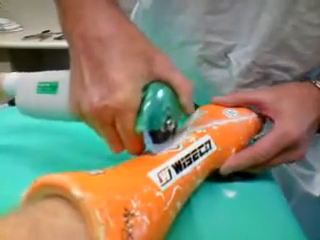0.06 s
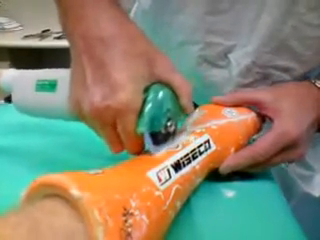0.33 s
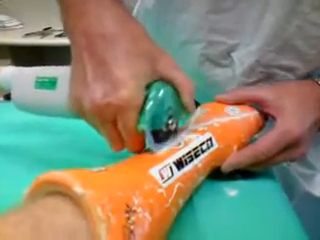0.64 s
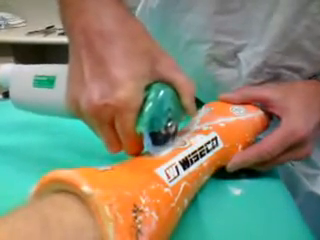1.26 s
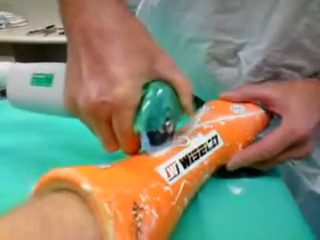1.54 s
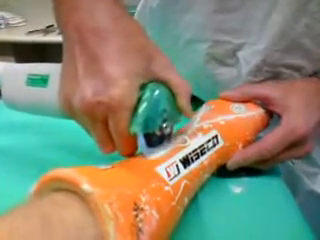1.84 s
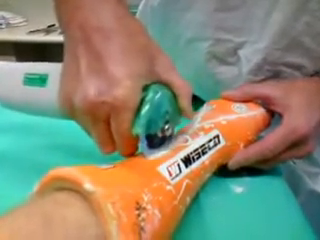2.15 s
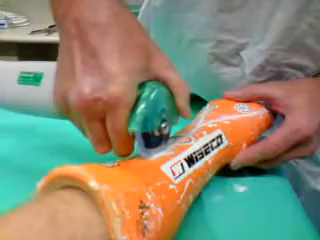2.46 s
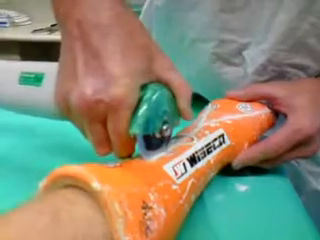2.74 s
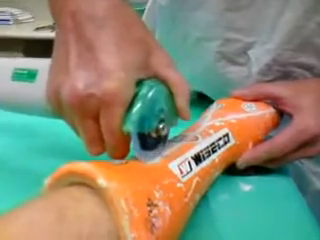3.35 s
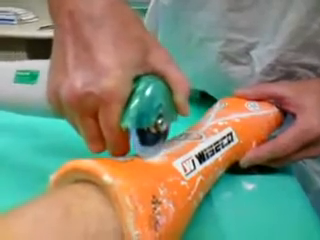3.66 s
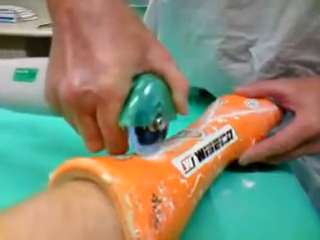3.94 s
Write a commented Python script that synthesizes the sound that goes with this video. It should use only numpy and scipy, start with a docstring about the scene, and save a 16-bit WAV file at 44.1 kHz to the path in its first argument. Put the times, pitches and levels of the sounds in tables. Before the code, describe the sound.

An electric saw buzzes loudly and harshly as it cuts through a hard cast.

```python
"""Small room, one microphone close to an oscillating electric saw that cuts a hard cast.
From the start each stroke knocks the hollow shell (a low buzz), chatters the teeth against it
(a bright buzz) and scrapes off grit; the steel blade rings near 4.5 kHz. The motor sags whenever
the blade is pressed in, and now and then the blade catches and squeals. Towards the end it only
grazes the cast: the motor whines almost freely and a low rumble swells."""
import sys
import numpy as np
from scipy import signal
from scipy.fft import rfft, irfft, next_fast_len
from scipy.io import wavfile
from scipy.ndimage import uniform_filter1d, map_coordinates

SR = 44100
rng = np.random.default_rng(int(sys.argv[2]) if len(sys.argv) > 2 else 0)


def transcribe(signal):
    """Save signal, clipped to [-1, 1], as a 16-bit WAV file at the path in sys.argv[1]."""
    frames = np.atleast_2d(signal).T
    limited = np.clip(frames, -1, 1)
    pcm = np.round(limited * 32767).astype(np.int16)
    wavfile.write(sys.argv[1], SR, pcm)


N = 176400
TIME_S = np.arange(N) / SR


def amp(db):
    """Decibels to gain."""
    return 10 ** (np.asarray(db) / 20)


def unit(x):
    """Scale to rms 1."""
    return x / np.sqrt(np.mean(np.abs(x) ** 2) + 1e-20)


def even(x, size):
    """Hold x at a steady rms of 1 over size samples."""
    return x / np.sqrt(np.abs(uniform_filter1d(x * x, size)) + 1e-9)


def curves(rows):
    """One value per sample for each column after the time."""
    times, *columns = np.transpose(rows)
    return [np.interp(TIME_S, times, column) for column in columns]


def wobble(rate_hz):
    """A smooth random curve with rate_hz knots a second."""
    knots = rng.standard_normal(int(N * rate_hz / SR) + 4)
    return map_coordinates(knots, [TIME_S * rate_hz])


def filtered(x, response):
    """Filter x by a gain given as a function of frequency."""
    size = next_fast_len(N + SR // 2)
    return irfft(rfft(x, size) * response(np.fft.rfftfreq(size, 1 / SR)), size)[:N]


def coloured(x, points):
    """Shape x by rows of frequency_hz, gain_db, dying away an octave past each end; rms 1."""
    freqs, db = np.transpose(points)
    freqs = np.r_[freqs[0] / 2, freqs, freqs[-1] * 2]
    db = np.r_[-120, db, -120]
    return unit(filtered(x, lambda hz: amp(np.interp(np.log(hz + 1), np.log(freqs), db))))


def buzz(turns, orders, drift, drift_hz):
    """Overtones of the stroke; each drifts in strength and phase as the contact moves."""
    out = np.zeros(N)
    for order in orders:
        path = signal.resample(rng.standard_normal((256, 2)) @ [1, 1j], 256 * 16)
        shift = np.interp(TIME_S * drift_hz * 16, np.arange(len(path)), path)
        overtone = np.exp(2j * np.pi * (order * turns + rng.random()))
        out += ((1 + drift * shift) * overtone).real
    return out


def scrapes(turns, scatter_db, sharpness=1.2, back_gain=.8):
    """A burst of grit on each forward and return stroke, no two alike."""
    swing = np.cos(2 * np.pi * turns)
    forward = np.exp(sharpness * (swing - 1))
    back = back_gain * np.exp(-sharpness * (swing + 1))
    sizes = amp(scatter_db * rng.standard_normal(N // 20))
    half_stroke = np.abs(2 * turns + .5).astype(int)
    return (forward + back) * sizes[half_stroke] * rng.standard_normal(N)


def shell(turns):
    """The strokes shake the saw's housing and the hollow cast; the blade's flank rubs in the slot."""
    # Shaking of the shell, stroke tone and low overtones: time_s, tone_db, low_relative_db
    shaking = [(0, -43.5, -36.5), (.05, -36, -36.5), (.6, -43.5, -35), (.66, -50, -43.5), (.76, -55, -51),
               (.81, -42.5, -52), (.98, -49, -40), (1.43, -39, -37.5), (1.54, -42.5, -32.5),
               (1.64, -53.5, -46), (1.81, -38, -32), (1.9, -45.5, -39), (2.17, -44.5, -34.5),
               (2.31, -49, -41), (2.39, -38, -41), (2.54, -46, -42), (2.68, -39, -36.5),
               (2.82, -41.5, -32.5), (2.95, -45, -42.5), (3.07, -46.5, -39.5), (3.12, -57.5, -42.5),
               (3.3, -41.5, -46), (3.45, -43.5, -38), (3.6, -46.5, -47.5), (4, -44.5, -44)]
    # Strength of the midrange buzz: time_s, relative_db
    middle_levels = [(0.0, -24), (0.09, -27), (0.13, -27.5), (0.18, -28), (0.62, -31), (0.64, -37),
                     (0.85, -26.5), (0.89, -30.5), (0.93, -29), (1.23, -31), (1.26, -26), (1.41, -36),
                     (1.45, -26), (1.47, -33), (1.7, -30.5), (1.79, -24), (2.01, -33.5), (2.04, -26.5),
                     (2.25, -33.5), (2.45, -28.5), (2.89, -26), (2.92, -30.5), (3.08, -29.5), (3.14, -35),
                     (3.18, -29.5), (3.25, -38.5), (3.48, -24.5), (3.61, -40), (3.72, -34.5), (3.99, -31.5)]
    # Low resonances of the shell: frequency_hz, gain_db
    low_colour = [(400, -10.5), (530, -5), (750, 1.5), (860, -3), (1050, 0), (1250, 2), (1450, -8),
                  (1900, -30.5)]
    # Spectrum of the midrange buzz: frequency_hz, gain_db
    middle_colour = [(1100, -14), (1400, -8), (1650, -2), (1800, -5.5), (2000, -1), (2230, -2.5),
                     (2390, -10.5), (2560, -1), (2900, -10), (3500, -31.5)]
    # Spectrum of the dull rubbing: frequency_hz, gain_db
    rub_colour = [(150, -16.5), (400, -10.5), (800, -5), (1300, -2), (1700, 2), (2400, 0), (3200, -17.5)]
    tone_db, low_db = curves(shaking)
    middle_db, = curves(middle_levels)
    rub_db = -39 + 0.067 * (low_db - low_db.mean())  # rubbing grows a little with the shaking
    tone = amp(tone_db) * unit(np.sin(2 * np.pi * turns))
    low = buzz(turns, range(2, 7), drift=0.49, drift_hz=38)
    low = amp(low_db + 0.5) * even(coloured(low, low_colour), size=5000)
    middle = buzz(turns, range(4, 13), drift=2.0, drift_hz=48)
    middle = amp(middle_db - 1.5) * even(coloured(middle, middle_colour), size=3500)
    rub = amp(rub_db) * coloured(scrapes(turns, scatter_db=5.0), rub_colour)
    return tone + low + middle + rub


def teeth(turns):
    """The teeth chatter against the cast and scrape off grit."""
    # Share of scraping in the bite: time_s, share_db
    grit_shares = [(0, -4.5), (.4, -4.5), (.7, -3), (.87, -10), (1.02, -3), (1.2, -1), (1.5, -5),
                   (1.65, -2), (1.95, -7.5), (2.35, -2.5), (2.6, -5), (3.0, -3.5), (3.2, -1.5), (3.5, -1.5),
                   (3.65, -5.5), (4, 0)]
    # Spectrum of the chatter: frequency_hz, gain_db
    chatter_colour = [(2000, -42.5), (2450, -25), (2750, -10), (3050, -10.5), (3350, -2), (3700, -6),
                      (4000, 0), (4350, 1.5), (4580, -1.5), (4750, -8.5), (5050, -18), (5350, -17.5),
                      (5600, -23), (6000, -32), (7000, -40.5), (8500, -62)]
    # Spectrum of the grit: frequency_hz, gain_db
    grit_colour = [(150, -46), (400, -41), (800, -28), (1300, -27), (2000, -20.5), (2400, -16.5),
                   (2800, -8.5), (3400, -3.5), (4000, 0.5), (4550, 2), (4800, -13), (5050, -14),
                   (5350, -14), (5600, -21), (6000, -26), (7000, -34.5), (8000, -47.5), (8700, -60.5)]
    grit_db, = curves(grit_shares)
    share = np.clip(amp(grit_db) ** 2, 0, .95)
    chatter = buzz(turns, range(7, 31), drift=1.0, drift_hz=30)
    chatter = even(coloured(chatter, chatter_colour), size=3000)
    grit = coloured(scrapes(turns, scatter_db=1.83), grit_colour)
    return amp(1.5) * np.sqrt(1 - share) * chatter + amp(1) * np.sqrt(share) * grit


def blade(cut, stroke_hz, ring_hz=4536, width_hz=65, split_hz=3848):
    """The cut and the steel blade that it rings; the colour shifts with the contact."""
    # How hard the teeth bite: time_s, relative_db
    bite = [(0.0, -13), (0.38, -19.0), (0.4, -15), (0.5, -17.5), (0.52, -17), (0.65, -20), (0.7, -16.5),
            (0.83, -16.5), (0.86, -13), (0.94, -20.5), (0.96, -16.0), (1.32, -14.5), (1.41, -17),
            (1.44, -14.5), (1.46, -24), (1.49, -16), (1.54, -15), (1.56, -18), (1.64, -15), (1.66, -17),
            (1.81, -15.0), (1.86, -17.5), (1.89, -13.5), (1.99, -18), (2.03, -18), (2.11, -18.5),
            (2.13, -16), (2.2, -14.5), (2.22, -20.0), (2.37, -18), (2.41, -15), (2.48, -16.5), (2.51, -16),
            (2.54, -16), (2.66, -15.0), (2.81, -16.5), (2.83, -11), (2.85, -20), (2.92, -16), (2.95, -16.5),
            (3.12, -17), (3.14, -21.5), (3.2, -16.5), (3.24, -27), (3.28, -26), (3.31, -21.0),
            (3.41, -19.0), (3.43, -15.5), (3.54, -14.5), (3.56, -19.5), (3.66, -26.5), (3.72, -19),
            (3.84, -27), (3.93, -14.5), (3.97, -24), (3.99, -19)]
    # Weight of the cut's lower band against its upper band: time_s, relative_db
    depth = [(0, 4), (.09, -1.5), (.2, -1), (.3, -3), (.42, -4), (.52, 1), (.62, -2), (.76, -4),
             (.88, -2.5), (.95, -6), (1.0, -4), (1.1, -2.5), (1.25, 0), (1.32, -7), (1.5, -1), (1.6, -4),
             (1.8, -1.5), (1.9, -7), (2.05, -6), (2.2, -1.5), (2.3, -6), (2.42, -2), (2.52, -4), (2.65, -5),
             (2.76, -5.5), (2.9, -8), (3.05, -6.5), (3.2, -9), (3.35, -8), (3.5, -9), (3.7, -12.5),
             (3.92, -11), (4, -3.5)]
    bite_db, = curves(bite)
    depth_db, = curves(depth)
    ring = filtered(cut, lambda hz: 1j * hz * width_hz / (ring_hz ** 2 - hz ** 2 + 1j * hz * width_hz))
    ring_db = -7.5 - 0.29 * (stroke_hz - stroke_hz.mean())  # stronger as the motor sags
    lower = filtered(cut, lambda hz: 1 / (1 + (hz / split_hz) ** 24))
    upper = cut - lower + amp(ring_db) * unit(ring)
    mix = amp(depth_db + 2) * even(lower, size=3000) + even(upper, size=3000)
    flutter_db = 1.3 * wobble(rate_hz=60)
    return amp(bite_db - 0.55 + flutter_db) * even(mix, size=1500)


def whine(turns):
    """Gear and blade sing in clean overtones as the motor nears its free speed."""
    # Strength of the whine: time_s, level_db
    levels = [(0, -33.5), (.3, -44), (.7, -45), (.87, -31.5), (1.05, -34.5), (1.3, -39.5), (3.1, -43),
              (3.3, -29.5), (3.5, -30.5), (3.62, -27.5), (3.72, -22), (3.84, -24), (3.92, -22.5), (4, -28)]
    # Its overtones: stroke_multiple, relative_db
    overtones = [(5, -16.5), (6, -20), (7, -11), (9, -7.5), (10, -9), (11, -11), (12, -7), (13, -27.5),
                 (14, -10), (15, -4), (16, 0.5)]
    whine_db, = curves(levels)
    partials = np.zeros(N)
    for order, db in overtones:
        waver_db = .7 * wobble(rate_hz=8)
        partials += amp(db + waver_db) * np.sin(2 * np.pi * (order * turns + rng.random()))
    return amp(whine_db) * unit(partials)


def room(x, t60_s=.16):
    """The short answer of the close walls, arriving after 4 ms."""
    t = np.arange(SR // 3) / SR
    tail = rng.standard_normal(len(t)) * amp(-60 * t / t60_s) * (t > .004)
    return signal.fftconvolve(x, tail / np.linalg.norm(tail))[:N]


def background():
    """Mains hum of the motor over faint room tone and a low rumble."""
    # Motor hum: pitch_hz, level_db
    hum_tones = [(100, -65.5), (200, -68.5)]
    # The rumble, swelling near the end: time_s, level_db
    rumble_levels = [(0, -69), (2.4, -68), (3.4, -58.5), (3.7, -59.5), (4, -46.5)]
    # Spectrum of the rumble: frequency_hz, gain_db
    rumble_colour = [(30, -21), (80, -0.5), (160, -3), (300, -6.5)]
    # Spectrum of the room tone: frequency_hz, gain_db
    room_colour = [(20, -9), (50, -5), (90, -1.5), (130, -4), (200, 3), (400, -6), (1500, -30)]
    rumble_db, = curves(rumble_levels)
    hum = sum(amp(db) * unit(np.sin(2 * np.pi * hz * TIME_S)) for hz, db in hum_tones)
    rumble = amp(rumble_db) * coloured(rng.standard_normal(N), rumble_colour)
    room_tone = amp(-58.5) * coloured(rng.standard_normal(N), room_colour)
    return hum + rumble + room_tone


def squeals(turns):
    """The blade catches and a single overtone swells briefly."""
    # Catches of the blade: centre_s, length_s, stroke_multiple, level_db
    catches = [(0.093, .06, 15, -18), (.14, 0.26, 4, -31.5), (0.138, 0.063, 8, -23.5),
               (0.549, 0.11, 18, -19), (0.879, .1, 13, -19.5), (0.942, 0.043, 10, -27.5),
               (1.021, 0.083, 16, -23), (1.317, 0.058, 16, -19), (1.443, .05, 8, -29),
               (1.898, 0.098, 17, -20.5), (2.507, 0.073, 16, -19), (2.95, .26, 5, -33),
               (2.998, 0.24, 3, -32), (3.431, 0.14, 6, -30)]
    out = np.zeros(N)
    for centre_s, length_s, order, db in catches:
        swell = np.cos(np.pi * np.clip((TIME_S - centre_s) / length_s, -.5, .5))
        out += amp(db) * swell * unit(np.sin(2 * np.pi * (order * turns + rng.random())))
    return out


def scene():
    """One motor speed drives every part of the saw; this close, the room stays well below it."""
    # Motor speed, sagging under load: time_s, stroke_hz
    speed = [(0, 274), (.04, 274), (.26, 252), (.42, 242), (.5, 244), (.62, 258), (.7, 251), (.8, 277),
             (.92, 281), (1.04, 280), (1.2, 277), (1.26, 273), (1.52, 253), (1.64, 265), (1.72, 280),
             (1.77, 280), (1.9, 269), (2.11, 255), (2.2, 257), (2.3, 259), (2.38, 270), (2.57, 276.5),
             (2.68, 274), (2.85, 244), (3.06, 254), (3.13, 250), (3.2, 278), (3.3, 282.5), (3.5, 281),
             (3.64, 287), (3.84, 285.2), (4, 283)]
    stroke_hz, = curves(speed)
    shaft = np.cumsum(stroke_hz) / SR  # one turn per stroke
    jitter_s = 16e-6 * wobble(rate_hz=130)
    turns = shaft + stroke_hz * jitter_s  # strokes land slightly early or late
    saw = shell(turns) + blade(teeth(turns), stroke_hz) + squeals(shaft) + whine(shaft)
    return (saw + amp(-11) * room(saw) + background())[None]


def record(dry):
    """The sharpest grit peaks are softly rounded off, and nothing sounds above 8650 Hz."""
    ceiling, top_hz = .74, 8650
    rounded = dry[0] / (1 + np.abs(dry[0] / ceiling) ** 8) ** (1 / 8)
    return filtered(rounded, lambda hz: hz < top_hz)[None]


dry = scene()
out = record(dry)
transcribe(out)
```